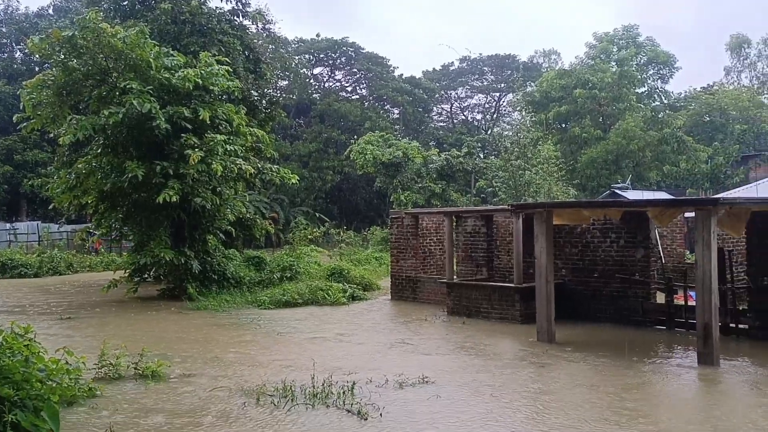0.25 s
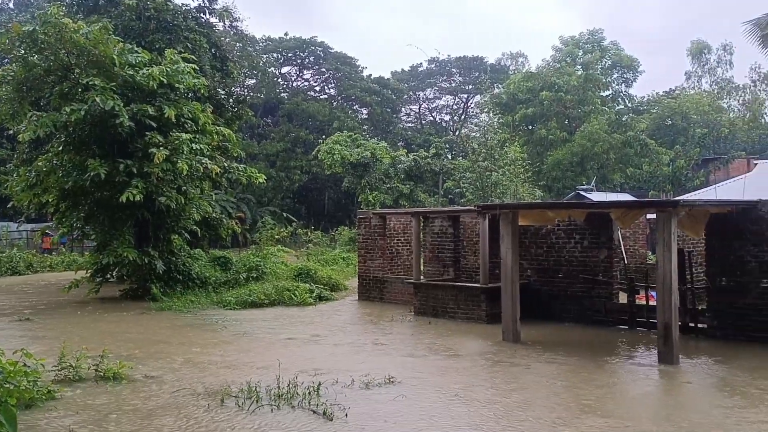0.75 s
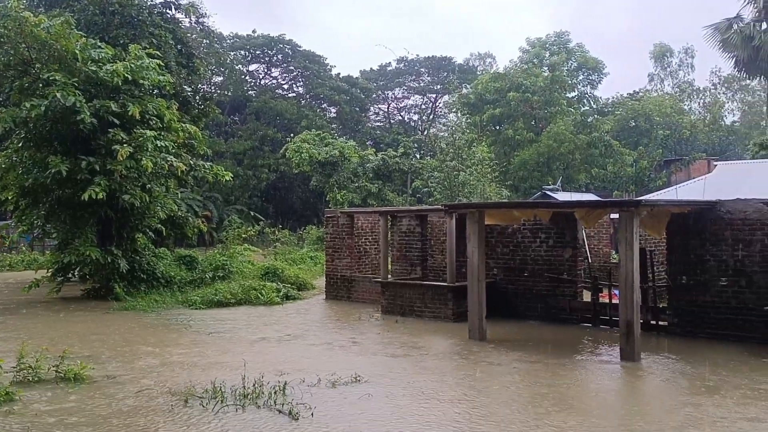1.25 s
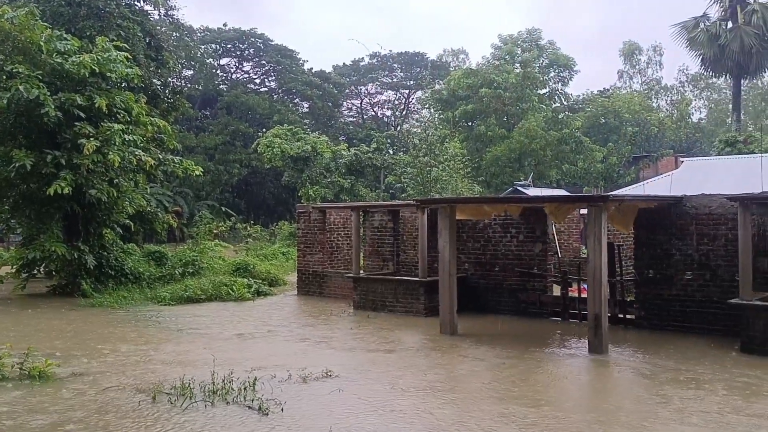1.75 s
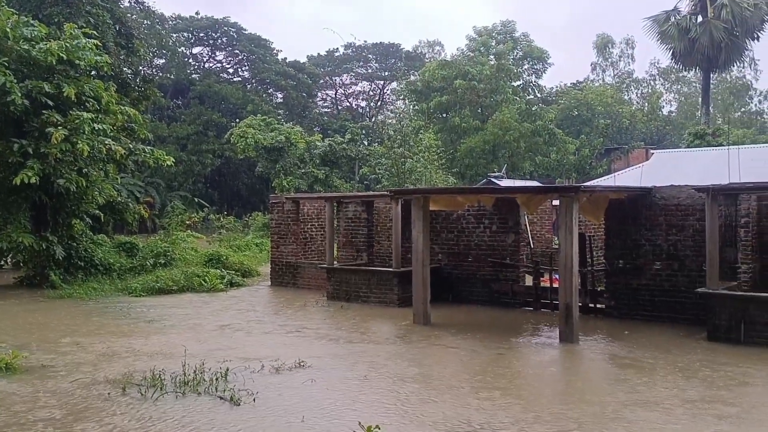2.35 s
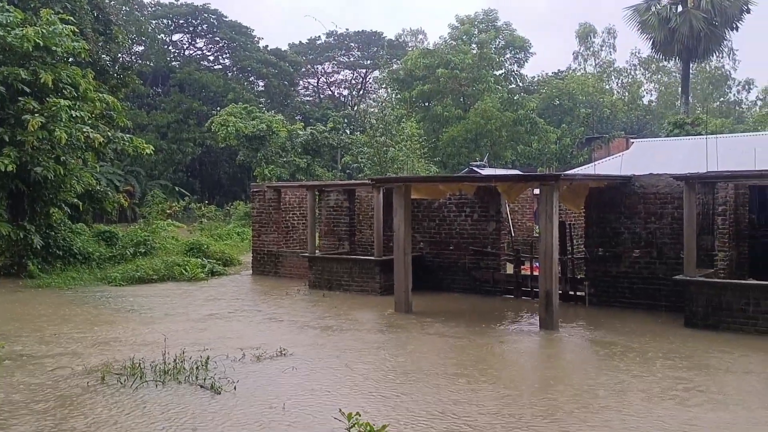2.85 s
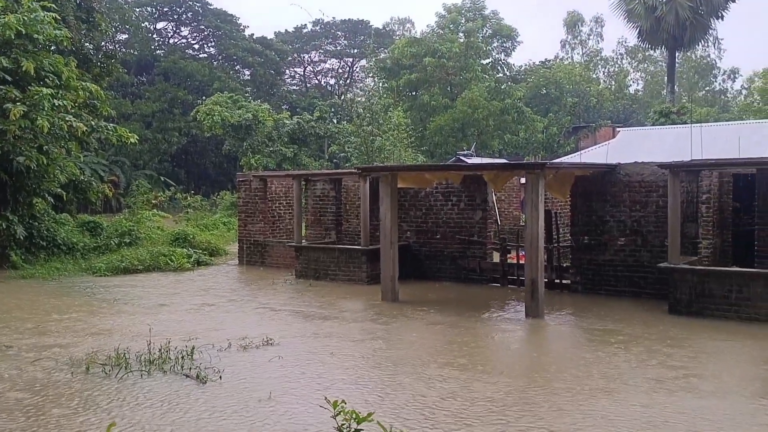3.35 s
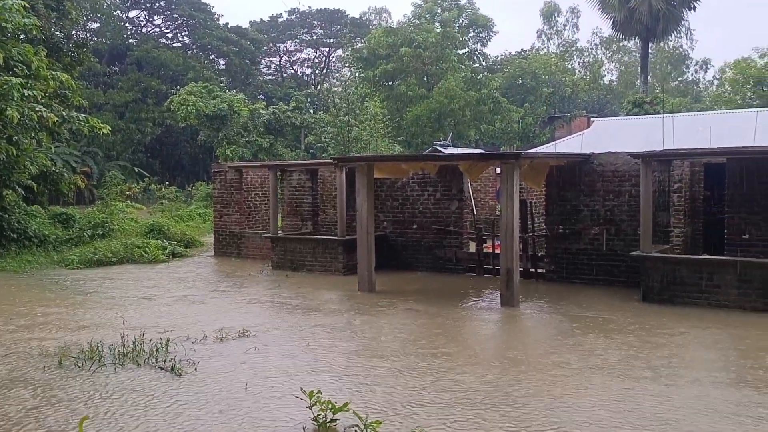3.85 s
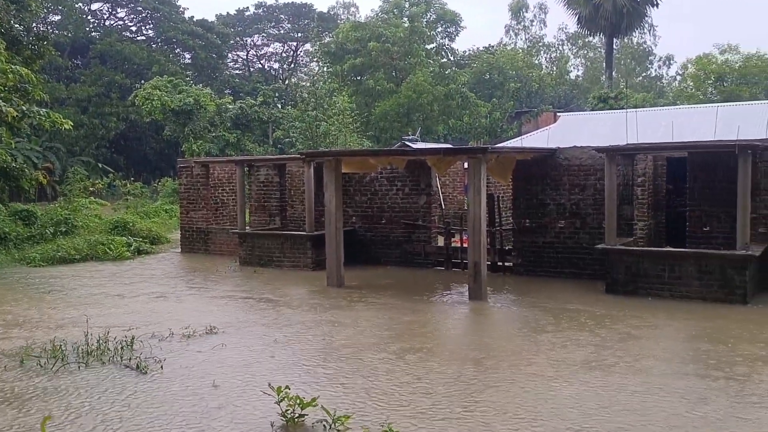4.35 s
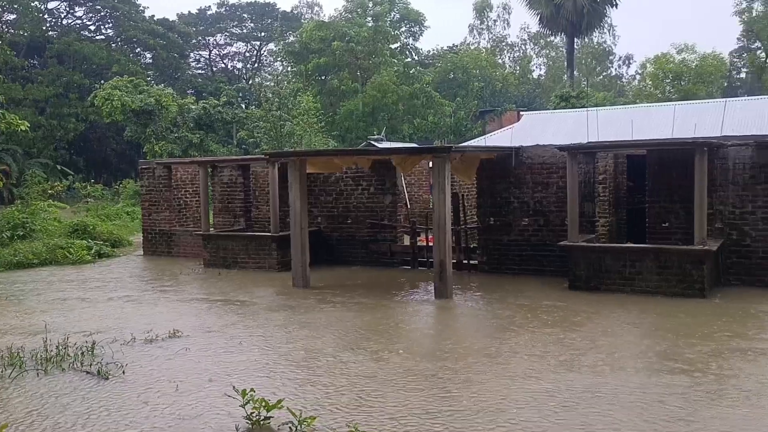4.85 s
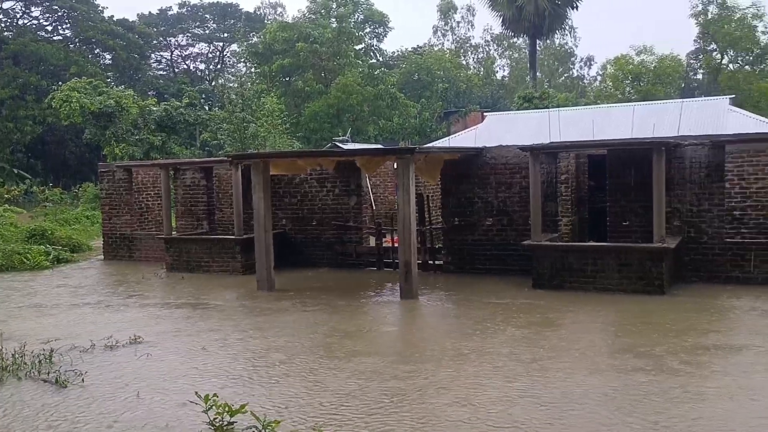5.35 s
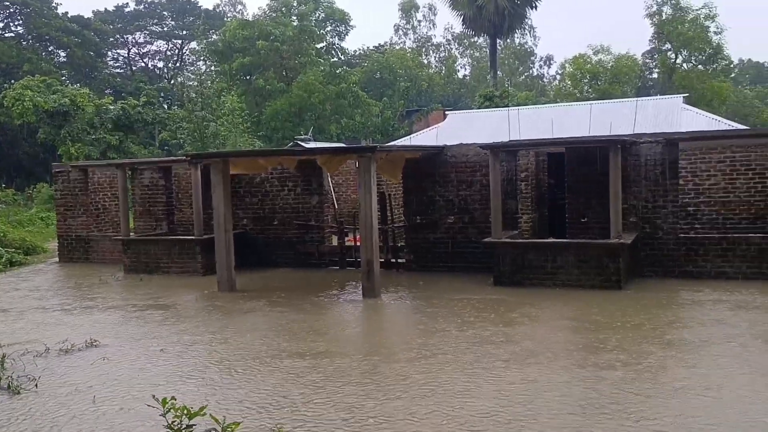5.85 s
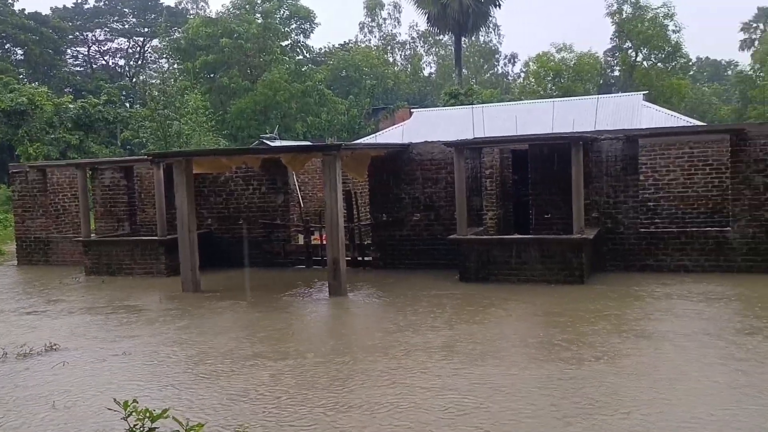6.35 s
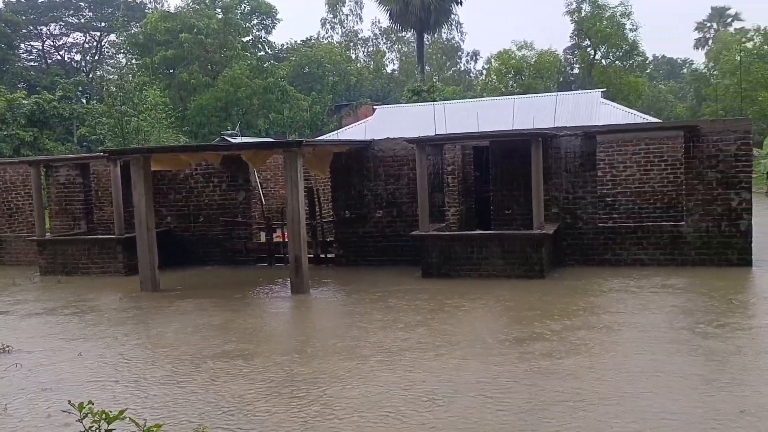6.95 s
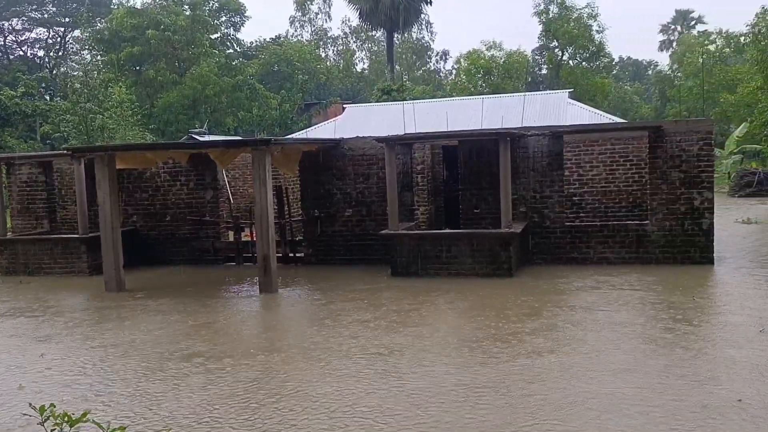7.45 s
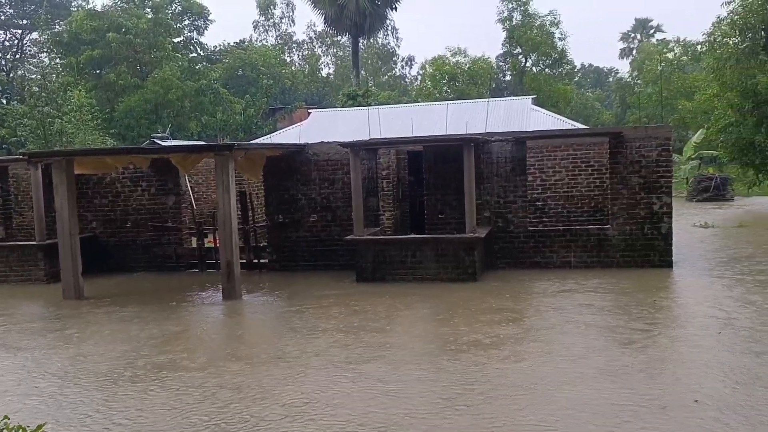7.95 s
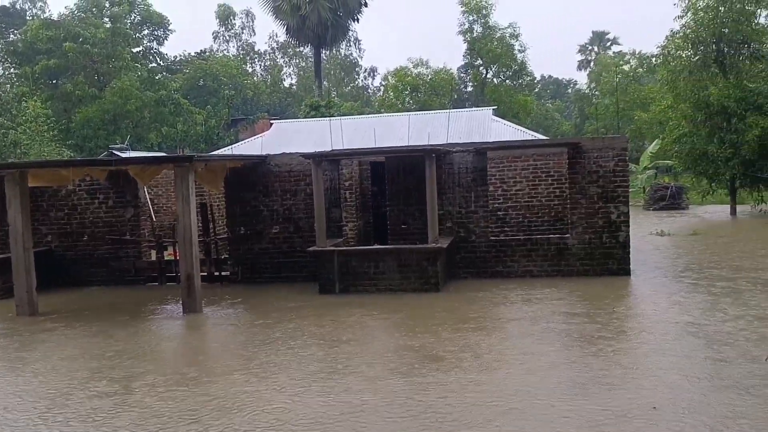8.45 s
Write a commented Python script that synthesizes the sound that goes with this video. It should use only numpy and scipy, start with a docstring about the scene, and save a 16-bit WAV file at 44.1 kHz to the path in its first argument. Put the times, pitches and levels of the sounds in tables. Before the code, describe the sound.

Heard from beneath an umbrella, rain hisses and patters continuously over floodwater and leaves. Close drops snap brightly and thump on the taut cloth overhead, scattered at first, then in a quick cluster, a short lull and a busier run. The last second holds only the rain and small, high ticks of spray. Wind rumbles very faintly on the microphone, and the rain sounds stronger on the left.

```python
"""Steady rain on a flooded yard, heard from under an umbrella through two unlike microphones.
Countless far impacts merge into a thin, patchy hiss; nearer drops patter and crack as damped rings.
Large drops strike the taut cloth overhead, which thumps like a membrane, and spray ticks close by
in short bursts of treble noise. Faint low puffs of wind on the microphones come and go."""
import sys
import numpy as np
from scipy import signal
from scipy.fft import rfft, irfft, next_fast_len
from scipy.io import wavfile
from scipy.ndimage import uniform_filter1d

SR = 44100
rng = np.random.default_rng(int(sys.argv[2]) if len(sys.argv) > 2 else 0)


def digitize_waveform(pressure):
    """Quantize a signal to 16-bit integers and store it at the path in sys.argv[1].

    Rows of a 2-D input are taken as channels; values are limited to [-1, 1].
    """
    field = np.atleast_2d(pressure).T
    bounded = np.clip(field, -1, 1)
    quanta = np.round(bounded * 32767).astype(np.int16)
    wavfile.write(sys.argv[1], SR, quanta)


N = 384111

# Strength of the rain over time: time_s, hiss_db, spray_db
RAIN_LEVELS = [(0.0, -41, -57), (0.31, -39.5, -55), (1.57, -41, -55), (1.75, -40, -54.5), (2.67, -40, -55),
               (4.49, -40, -54.5), (5.68, -38.5, -52), (6.09, -39.5, -54), (6.77, -38.5, -52.5),
               (7.47, -39.5, -54), (7.93, -40.5, -54), (8.71, -40, -52.5)]
# Relative spectra of far drops, near splashes and fine spray: frequency_hz, density_db
HISS_SPECTRUM = [(600, 4), (1000, -0.5), (1500, -1), (2000, 2), (2600, 5.5), (3300, 3.5), (3900, 0.5),
                 (4500, -6.5), (5500, -4), (6600, -11.5), (9500, -23.5), (12400, -42)]
SPATTER_SPECTRUM = [(900, -29), (1300, 27), (2700, 0), (5000, -1), (9000, -32), (15000, -47), (17000, -37)]
SPRAY_SPECTRUM = [(4410, -39), (7500, 10.5), (10400, 2.5), (12600, 4), (15200, 11), (15900, 14),
                  (16300, 16), (16500, -45)]
# Near drops bursting: start_s, level_db, pitch_hz, splash_relative_db
DROP_CRACKS = [(0.0304, -14.5, 2480, -41), (0.169, -25, 2640, -18), (0.192, -23, 1930, -21),
               (0.2846, -22, 2720, -28), (0.3576, -35.5, 2370, -1.5), (0.3704, -21.5, 2750, -14),
               (0.454, -29, 3550, -15), (0.4882, -17, 2050, -38), (0.5931, -25, 2460, -23),
               (0.894, -22.5, 2180, -18), (1.0813, -24.5, 2800, -14), (1.501, -15, 2380, -49),
               (1.5618, -21.5, 2540, -26), (1.6596, -22, 2700, -11), (1.8791, -17, 2500, -30),
               (2.061, -19.5, 2470, -32), (2.348, -15.5, 2780, -22), (2.805, -25, 2130, -28),
               (2.9622, -38, 2700, -17), (3.016, -22.5, 2500, -33), (3.3538, -31, 2750, -24),
               (3.3697, -22.5, 2490, -28), (3.3975, -32, 3500, -25), (3.4116, -16, 3150, -47),
               (3.482, -22, 2050, -26), (3.5399, -14.5, 2830, -48), (3.615, -20, 3220, -35),
               (3.694, -17.5, 1680, -37), (3.918, -32, 2990, -24), (5.0513, -23, 2040, -16),
               (5.079, -19, 3150, -22), (5.0914, -18.5, 2650, -24), (5.326, -17.5, 2600, -16),
               (5.521, -18.5, 2880, -18), (5.5718, -25, 1960, -25), (5.8627, -21, 2790, -23),
               (5.9943, -16, 1920, -33), (6.0472, -36, 2690, -28), (6.0911, -17.5, 2630, -34),
               (6.343, -24, 2150, -25), (6.3724, -17.5, 3380, -33), (6.4, -19.5, 1980, -30),
               (6.4456, -20.5, 2390, -31), (6.4821, -16, 2770, -30), (6.601, -27, 2400, -14),
               (6.6533, -23.5, 2350, -11), (6.7275, -31, 2850, -8), (6.77, -17, 2900, -35),
               (6.8732, -19.5, 3500, -33), (6.8874, -21.5, 1960, -23), (7.013, -17, 1820, -23),
               (7.3538, -18.5, 3320, -28), (7.437, -26, 2100, -40), (7.5655, -22.5, 2630, -9.5),
               (7.6036, -22, 1720, -31), (7.6358, -19, 1720, -33), (7.668, -21, 2390, -24)]
# Heavy drops on the cloth: start_s, level_db, pitch_hz, ring_cycles,
# overtone_db, overtone_hz, overtone_cycles, left_over_right_db
CLOTH_THUMPS = [(0.005, -31, 441, 5.2, -14, 665, 0.69, 1), (0.031, -14, 302, 1.36, -15, 600, 1, -0.5),
                (0.191, -56, 234, 1.9, -32.5, 1040, 4, 0), (0.372, -70, 598, 2.5, -25.5, 934, 5.3, 0),
                (0.488, -13.5, 296, 0.67, -18.5, 885, 1.4, 1.5), (0.589, -49, 151, .9, -37, 1110, 3.9, 8),
                (0.626, -38, 276, 2.5, -25.5, 1110, 1.7, 2),
                (0.894, -24.5, 280, 2.8, -10.5, 640, 0.47, 1.5),
                (1.501, -32, 322, 2.5, -12.5, 1040, 0.95, 4), (1.878, -34.5, 287, 1.6, -48, 1290, 3.1, -4),
                (2.347, -19, 237, 1.46, -18, 820, 1.7, -1.5), (2.742, -60, 280, 1.5, -35, 1190, 4.4, 3),
                (3.155, -55, 280, 1.7, -30, 1320, 4.2, -1), (3.388, -66, 554, 2.3, -31.5, 1270, 6.1, -1),
                (3.481, -19, 290, 1.7, -23, 1124, 6.2, -1.5), (3.508, -39, 258, 1.3, -41, 1240, 3.1, 4),
                (3.54, -19, 428, 0.93, -27, 1020, 2.5, 1.5), (3.617, -19, 270, 2.6, -22.5, 900, 2.6, -1.5),
                (3.695, -36, 505, 4, -16.5, 726, 1.46, 0), (5.053, -36, 594, 5.4, -19.5, 800, 1.9, -2),
                (5.075, -49, 278, 2.1, -29, 775, 1.6, 0.1), (5.093, -38, 594, 3.4, -23, 1200, 2.9, 0),
                (5.325, -37.5, 312, 2.2, -24, 1240, 1.7, 0), (5.863, -41.5, 326, 1.5, -30.5, 1210, 4, 2),
                (5.994, -22, 436, 1.65, -25.5, 608, 2.3, 1), (6.096, -48, 239, 2.3, -26.5, 1350, 5.4, 0),
                (6.371, -12, 315, 0.91, -38, 576, 1.2, 0), (6.398, -17, 463, 1.5, -41, 597, 1.4, -1),
                (6.445, -34, 333, 2.5, -21.5, 1420, 2.6, -2), (6.482, -42, 410, 3.9, -28.5, 1290, 1.9, 3),
                (6.651, -26, 354, 2.9, -27, 630, 2.6, 1), (6.872, -18.5, 330, 0.84, -17, 925, 1.4, -2),
                (6.889, -34, 400, 1.1, -13.5, 1300, 1.1, -2), (6.899, -36, 568, 3.2, -18.5, 800, 1.3, -4),
                (6.915, -40, 400, 1.3, -17.5, 1000, 0.88, -4), (6.947, -39, 300, 1.3, -18, 1500, 1, -2),
                (6.96, -45, 300, 1.3, -21, 1500, 1.5, 0.1), (6.973, -23.5, 208, 1.26, -24, 1020, 1.6, 3.5),
                (7.012, -44, 164, 1.3, -32.5, 760, 5.2, 6), (7.353, -37, 516, 6.4, -40, 594, 6.7, 9),
                (7.438, -41, 159, 1.1, -33.5, 1260, 5.1, -2), (7.473, -46.5, 208, 3.7, -47, 1300, 3.1, -10),
                (7.603, -44, 151, 1.1, -33, 1100, 3.6, 0.1), (7.636, -60, 406, 2.1, -28, 1180, 6.5, -3),
                (7.668, -30, 524, 6.3, -10.5, 636, 0.53, -1.5)]
# Spray landing close by: start_s, level_db, pitch_hz
SPRAY_TICKS = [(0.2244, -33, 15300), (0.2553, -26, 15800), (0.3601, -34, 14400), (0.4534, -36, 14000),
               (0.5013, -33, 15500), (1.028, -27, 14900), (1.4097, -33, 15600), (1.6092, -29, 15300),
               (1.6315, -27, 15400), (1.7315, -30, 15300), (1.7838, -29, 14800), (1.8437, -36, 15300),
               (1.8647, -33, 15500), (2.141, -31.5, 12600), (2.2473, -30, 13400), (2.367, -41, 15200),
               (2.4691, -19, 15500), (2.4982, -29, 15700), (3.1203, -33, 15000), (3.239, -29, 15300),
               (3.9165, -33, 14800), (4.0716, -31, 15500), (4.129, -42, 15400), (4.4528, -35, 13900),
               (4.8337, -39, 15600), (5.1567, -29.5, 11800), (5.2974, -34, 14200), (5.3253, -39, 14100),
               (5.5206, -29, 15000), (5.6735, -30.5, 15500), (5.7496, -27, 15000), (5.9, -37, 14800),
               (6.1749, -34, 15100), (6.274, -31, 14800), (6.2991, -28, 14300), (6.4457, -33, 13400),
               (6.5012, -28, 14000), (6.566, -36, 9030), (6.7236, -38, 15700), (6.77, -30, 15600),
               (7.1731, -32, 11100), (7.2155, -35, 13900), (7.2305, -31, 14900), (7.566, -28.5, 14400),
               (7.6291, -33, 15500), (7.8171, -35, 15300), (7.8506, -31, 15300), (7.9678, -32, 15000),
               (8.0723, -29, 14700), (8.1878, -33, 15200), (8.2462, -40, 14300), (8.2646, -26, 9800),
               (8.4038, -32, 15500), (8.485, -31, 14900), (8.538, -26, 15500), (8.571, -28, 15000),
               (8.5894, -20, 15500), (8.6517, -27, 15600)]
# Wind on the microphones: start_s, length_s, level_db
WIND_PUFFS = [(0.001, 0.041, -34.5), (0.465, 0.23, -48), (0.72, 0.072, -54), (0.873, 0.072, -44),
              (1.103, 0.034, -58), (1.277, 0.11, -51.5), (1.542, 0.13, -60), (1.697, 0.11, -59),
              (1.935, 0.043, -53), (2.126, 0.13, -53.5), (2.338, 0.11, -48), (2.9, 0.048, -58),
              (3.508, 0.2, -54), (3.83, 0.085, -52), (4.08, 0.13, -56), (4.456, 0.106, -55),
              (5.24, 0.16, -60.5), (5.508, 0.088, -56.5), (5.813, 0.052, -59), (6.014, 0.22, -54.5),
              (6.35, 0.162, -52.5), (6.814, 0.25, -55.5), (7.61, 0.16, -58.5), (7.845, 0.41, -60),
              (8.41, 0.15, -54.5)]
# Relative spectra of the wind and of a dim low wash: frequency_hz, density_db
WIND_SPECTRUM = [(15, -49), (25, -47), (47, -11), (73, 2), (154, -3), (168, -24), (184, -37), (230, -37),
                 (300, -52), (510, -120)]
MURK_SPECTRUM = [(120, -12), (200, 4), (400, 1), (700, 1), (1000, 1.5), (1400, -14)]
# Unequal sensitivity of the microphones: frequency_hz, left_over_right_db
MIC_BALANCE = [(60, -0.5), (500, 1), (750, 1), (1050, 8), (1400, 9), (2000, 10), (2900, 12), (3700, 7.5),
               (4600, 4.5), (5600, -2.5), (6800, 2.5), (8300, 17), (10300, 13), (15000, 12.5)]


def rain(level_db):
    """Superposition: far impacts sum to a hiss, nearer ones stay distinct; all pass a low-cut filter."""
    hiss = wash(HISS_SPECTRUM, level_db + 4.5, coherence=0.013, patchy_db=2.27, flicker_db=1, size=512)
    drops = gain_of(level_db - 4) * patter(1950, 5600, cycles=1.22, per_s=500, spread_db=4, pitches=16)
    splashes = gain_of(level_db - 13.5) * spatter(per_s=60, spread_db=5)
    hz, t, spectra = signal.stft(hiss + drops + splashes, SR, nperseg=512, noverlap=384)
    below_hz = np.maximum(low_cut_hz(t) - hz[:, None], 0)
    spectra *= gain_of(-6.9 * below_hz / 100)  # 6.9 dB per 100 Hz
    return signal.istft(spectra, SR, nperseg=512, noverlap=384)[1][:, :N]


def low_cut_hz(t):
    """Noise suppression: a wandering low-cut filter opens after each loud thump, passing lower hiss."""
    rest_hz, lowest_hz, wander_hz = 1350, 800, 116
    open_hz_per_db, threshold_db, climb_hz_per_s = 18, -47, 3760
    start_s, db, _, _, over_db, *_ = np.transpose(CLOTH_THUMPS)[:, :, None]
    openings = open_hz_per_db * (np.maximum(db, over_db) - threshold_db) - climb_hz_per_s * (t - start_s)
    opening_hz = np.max(openings * (t >= start_s), axis=0).clip(0)
    wander = unit_rms(uniform_filter1d(rng.standard_normal(len(t)), size=30))
    return np.maximum(rest_hz + wander_hz * wander - opening_hz, lowest_hz)


def impacts(per_s, spread_db):
    """Independent drops arrive as a Poisson process: most impulses are small, a few large."""
    return gain_of(spread_db * np.minimum(rng.exponential(1, N), 4)) * (rng.random(N) < per_s / SR)


def patter(low_hz, high_hz, cycles, per_s, spread_db, pitches):
    """Impulse response: each drop excites a damped ring, unequal in level and delay left and right."""
    strikes, pitch_index = impacts(per_s, spread_db), rng.integers(0, pitches, N)
    out, t = np.zeros((2, N)), np.arange(600) / SR
    for k, hz in enumerate(np.geomspace(low_hz, high_hz, pitches)):
        mode = np.exp(-t * hz / cycles) * np.sin(2 * np.pi * hz * t)
        rings = signal.oaconvolve(strikes * (pitch_index == k), mode)[:N]
        side, lag = rng.uniform(-1, 1), rng.integers(-12, 24)
        out += [gain_of(5.4 * side) * np.roll(rings, lag), gain_of(-3 * side) * rings]
    return unit_rms(out)


def spatter(per_s, spread_db):
    """Brief impacts have wide spectra: drops on hard ground and leaves splash as decaying noise."""
    decay_s, size = 0.0025, next_fast_len(N)
    envelope = signal.lfilter([1], [1, -np.exp(-1 / (decay_s * SR))], impacts(per_s, spread_db))
    bursts = envelope * rng.standard_normal((2, N))
    colour = gain_of(spectrum_db(SPATTER_SPECTRUM, np.fft.rfftfreq(size, 1 / SR)))
    return unit_rms(irfft(rfft(bursts, size) * colour, size)[:, :N])


def drop_cracks():
    """A bursting drop excites one damped mode and a bright splash that differs at each microphone."""
    t60_s, splash_decay_s = 0.0062, 0.00039
    out, t = np.zeros((2, N)), np.maximum(np.arange(1200) / SR - 0.0006, 0)
    noises = rng.standard_normal((len(DROP_CRACKS), 2, len(t)))
    thin = signal.butter(3, 1200, "highpass", fs=SR, output="sos")
    for (start_s, db, hz, splash_db), noise in zip(DROP_CRACKS, noises):
        ring = np.sin(2 * np.pi * hz * t) * gain_of(-60 * t / t60_s)
        splash = gain_of(splash_db) * unit_rms(bandpass(noise, 4300, 7200)) * np.exp(-t / splash_decay_s)
        crack = gain_of(db) * signal.sosfiltfilt(thin, ring + splash)
        place(out, start_s, crack * gain_of([[6.5], [9.5]]))
    return out


def umbrella():
    """A struck membrane: the pitch sags as the dent spreads, and an overtone rings."""
    sag_s, swell_rise_s, swell_decay_s = 0.00018, 0.0032, 0.037
    out, t = np.zeros((2, N)), np.arange(9000) / SR
    noises = rng.standard_normal((len(CLOTH_THUMPS), len(t)))
    swell_envelope = (1 - np.exp(-t / swell_rise_s)) * np.exp(-(t / swell_decay_s) ** 2)
    for row, noise in zip(CLOTH_THUMPS, noises):
        start_s, db, hz, cycles, over_db, over_hz, over_cycles, pan_db = row
        turns = hz * t + 0.093 * (1 - np.exp(-t / sag_s))
        thump = gain_of(db) * highpass(cloth_mode(turns, cycles, t), 0.74 * hz)
        overtone = gain_of(over_db) * highpass(cloth_mode(over_hz * t, over_cycles, t), 0.3 * over_hz)
        swell_db = max(db - 21.5, over_db - 27)  # low noise swells briefly after each thump
        low_swell = gain_of(swell_db) * unit_rms(bandpass(noise, 120, 420)) * swell_envelope
        place(out, start_s, (thump + overtone + low_swell) * gain_of([[pan_db / 2], [-pan_db / 2]]))
    return out


def cloth_mode(turns, cycles, t, rise_s=0.0001):
    """A damped vibration whose near-Gaussian envelope holds briefly, then falls steeply."""
    return np.sin(2 * np.pi * turns) * (1 - np.exp(-t / rise_s)) * np.exp(-(turns / cycles) ** 1.94)


def spray_ticks():
    """A droplet's impact radiates a burst of treble noise; its rebound repeats it more weakly."""
    decay_s, bounce_s = 0.0009, 0.0035
    out, t = np.zeros((2, N)), np.arange(900) / SR
    noises = rng.standard_normal((len(SPRAY_TICKS), 2, len(t)))
    envelope = np.exp(-t / decay_s)
    envelope += 0.3 * np.roll(envelope, round(bounce_s * SR))
    for (start_s, db, hz), (left, other) in zip(SPRAY_TICKS, noises):
        treble = bandpass([left, 0.17 * left + 0.72 * other], 0.93 * hz, 1.25 * hz, order=1)
        burst = highpass(treble * envelope, 0.8 * hz, order=1)
        onset_amplitude = abs(burst[0, :20]).mean()
        place(out, start_s, gain_of(db) * burst / onset_amplitude)
    return out


def fine_spray(level_db):
    """Tiny droplets add incoherently to a high hiss, with a crackle of single damped rings."""
    mist = wash(SPRAY_SPECTRUM, level_db + 5.5, coherence=0.02, patchy_db=2, flicker_db=1.8, size=256)
    crackle = patter(11500, 15700, cycles=2.2, per_s=150, spread_db=4.5, pitches=12)
    return mist + gain_of(level_db - 4) * highpass(crackle, 9000)


def wind():
    """Fluctuating air pressure on the microphones rumbles in soft-edged puffs over a dim low wash."""
    calm_db, fade_s = -68.5, 0.065
    level_db = np.full(N, calm_db)
    for start_s, length_s, db in WIND_PUFFS:
        level_db[round(start_s * SR):round((start_s + length_s) * SR)] = db
    level_db = uniform_filter1d(level_db, round(fade_s * SR))
    rumble = wash(WIND_SPECTRUM, level_db, coherence=0.94, patchy_db=2.7, flicker_db=5.4, size=2048)
    murk = wash(MURK_SPECTRUM, level_db=-63.5, coherence=0.71, patchy_db=1, flicker_db=0.49, size=1024)
    return rumble + murk


def wash(spectrum, level_db, coherence, patchy_db, flicker_db, size):
    """Modulated noise: random short-time spectra with drifting patches and a flicker at all pitches."""
    hop = size // 4
    frames, hz = N // hop + 5, np.fft.rfftfreq(size, 1 / SR)
    left_re, left_im, other_re, other_im, *patches = rng.standard_normal((frames, len(hz), 6)).T
    left, other = left_re + 1j * left_im, other_re + 1j * other_im
    right = coherence * left + np.sqrt(1 - coherence ** 2) * other
    patches = unit_rms(uniform_filter1d(uniform_filter1d(patches, size=4, axis=1), size=12, axis=2))
    patches = patchy_db * patches * [[[1]], [[1.4]]]  # the right side is the more ragged
    flicker = flicker_db * unit_rms(uniform_filter1d(rng.standard_normal(frames), size=3))
    spectra = np.array([left, right]) * gain_of(spectrum_db(spectrum, hz)[:, None] + patches + flicker)
    noise = signal.istft(spectra, nperseg=size, noverlap=size - hop)[1][:, :N]
    return gain_of(level_db) * unit_rms(noise)


def place(mix, start_s, sound, left_lag_samples=7):
    """Path difference: a near sound enters the mix slightly later on the left."""
    for channel, lag in enumerate((left_lag_samples, 0)):
        part = mix[channel, round(start_s * SR) + lag:][:sound.shape[1]]
        part += sound[channel, :len(part)]


def gain_of(db):
    """Amplitude grows tenfold per 20 dB."""
    return 10 ** (np.asarray(db) / 20)


def unit_rms(x):
    """Normalisation to unit mean power."""
    return x / np.sqrt(np.mean(x ** 2) + 1e-20)


def spectrum_db(points, hz):
    """Interpolation on a log-frequency axis."""
    point_hz, db = np.transpose(points)
    return np.interp(np.log(hz + 1), np.log(point_hz + 1), db)


def highpass(x, hz, order=2):
    """Attenuation below a cutoff."""
    return signal.sosfilt(signal.butter(order, hz, "highpass", fs=SR, output="sos"), x)


def bandpass(x, low_hz, high_hz, order=2):
    """Attenuation outside a band."""
    return signal.sosfilt(signal.butter(order, [low_hz, high_hz], "bandpass", fs=SR, output="sos"), x)


def scene():
    """Linear superposition: the pressures of rain, umbrella, spray and wind add."""
    time_s, *levels = np.transpose(RAIN_LEVELS)
    hiss_db, spray_db = (np.interp(np.arange(N) / SR, time_s, db) for db in levels)
    return rain(hiss_db) + drop_cracks() + umbrella() + spray_ticks() + fine_spray(spray_db) + wind()


def record(dry):
    """Frequency response: the two microphones share the power unequally and pass a limited band."""
    size, cutoff_hz = next_fast_len(N + 4096), 15780
    ratio = gain_of(spectrum_db(MIC_BALANCE, np.fft.rfftfreq(size, 1 / SR)))
    response = np.array([ratio, np.ones_like(ratio)]) * np.sqrt(2 / (1 + ratio ** 2))
    heard = irfft(rfft(dry, size) * response, size)[:, :N]
    lowpass = signal.firwin(511, cutoff_hz, window=("kaiser", 9), fs=SR)
    return signal.oaconvolve(heard, lowpass[None], "same")


dry = scene()
out = record(dry)
digitize_waveform(out)
```